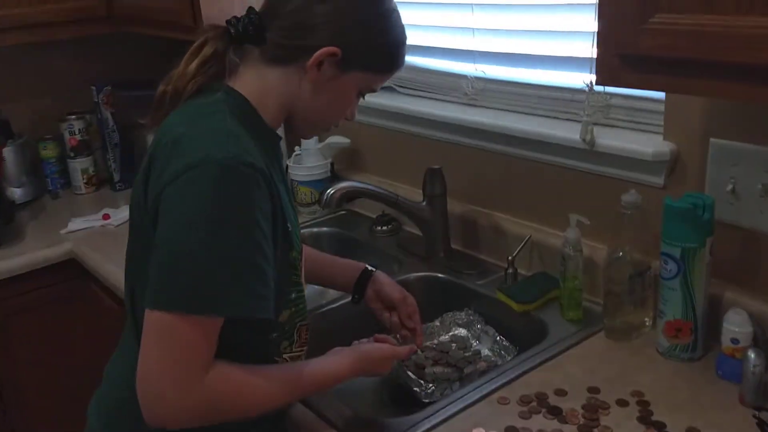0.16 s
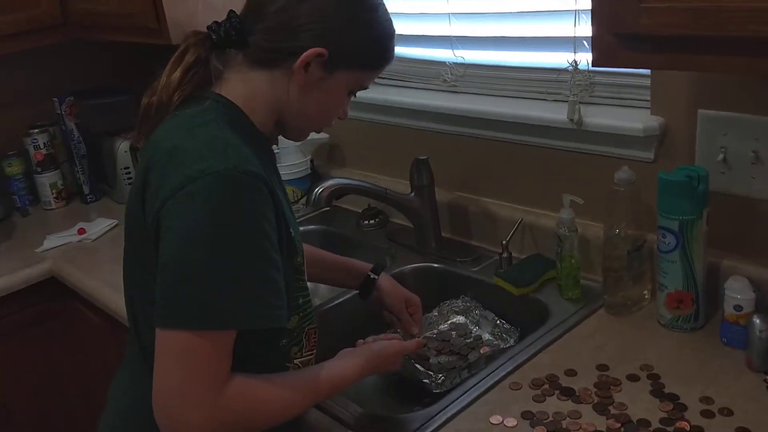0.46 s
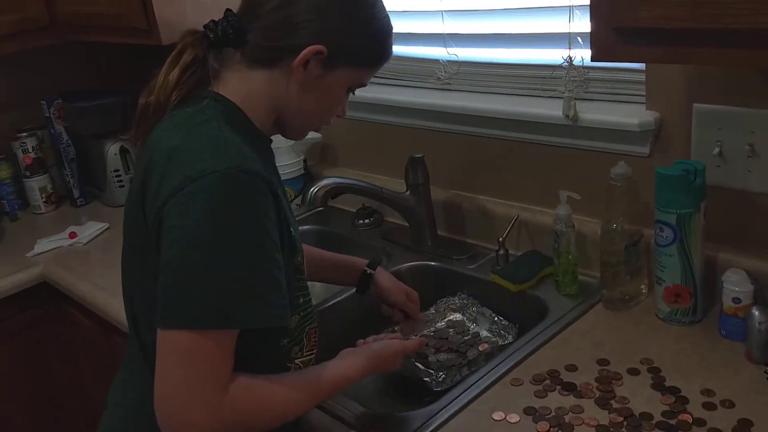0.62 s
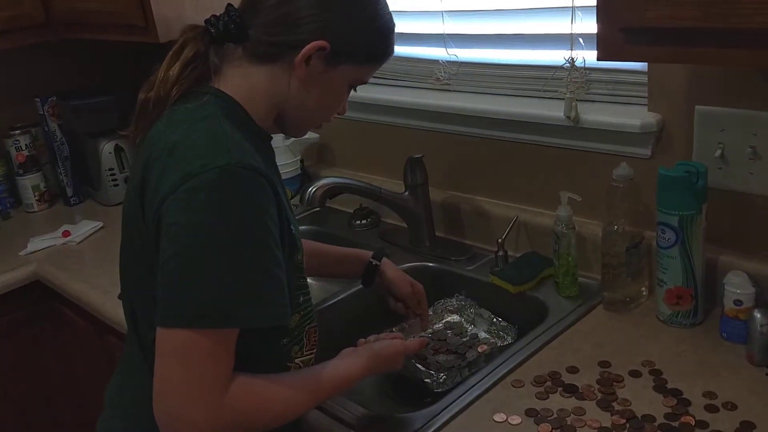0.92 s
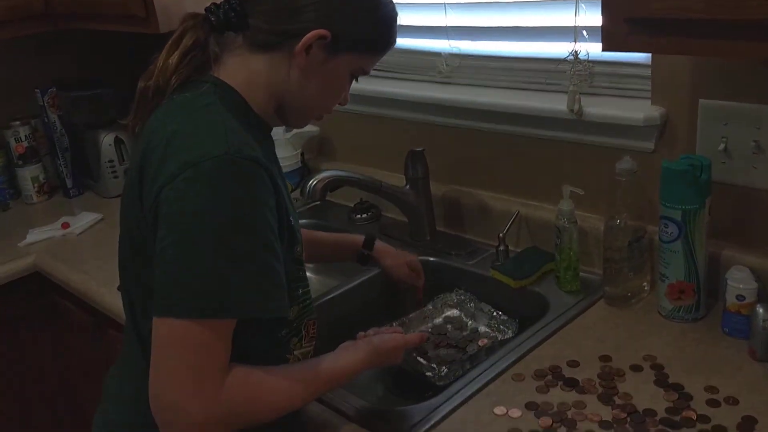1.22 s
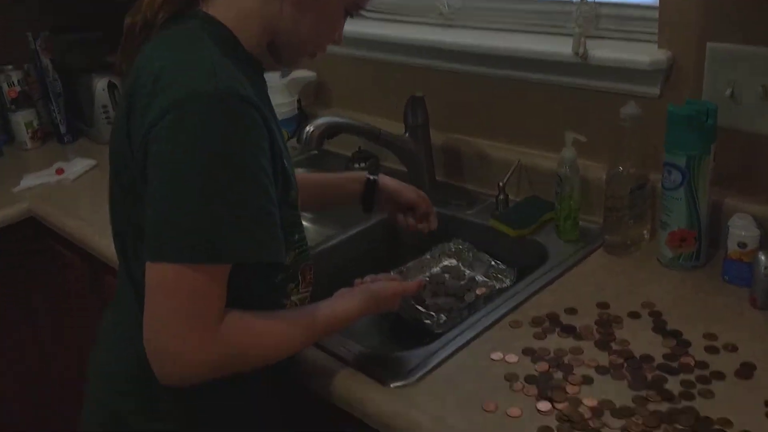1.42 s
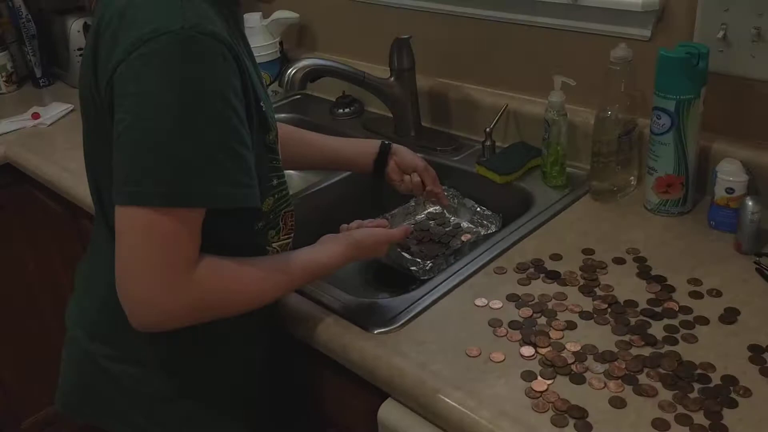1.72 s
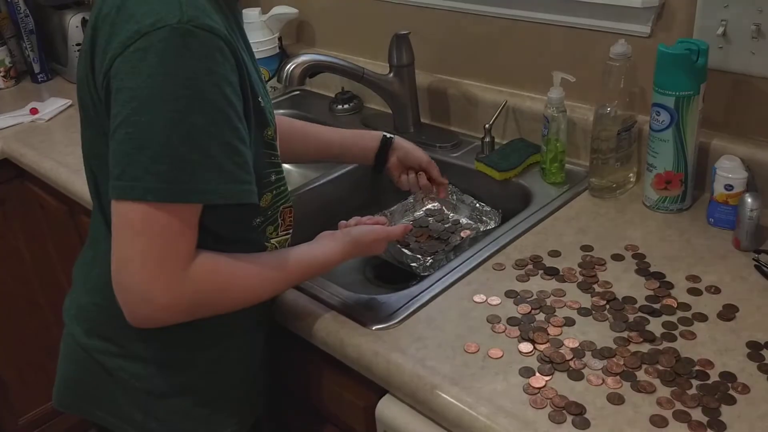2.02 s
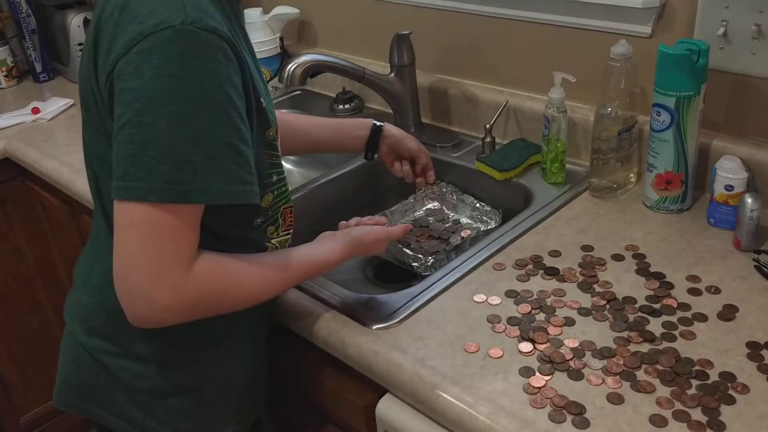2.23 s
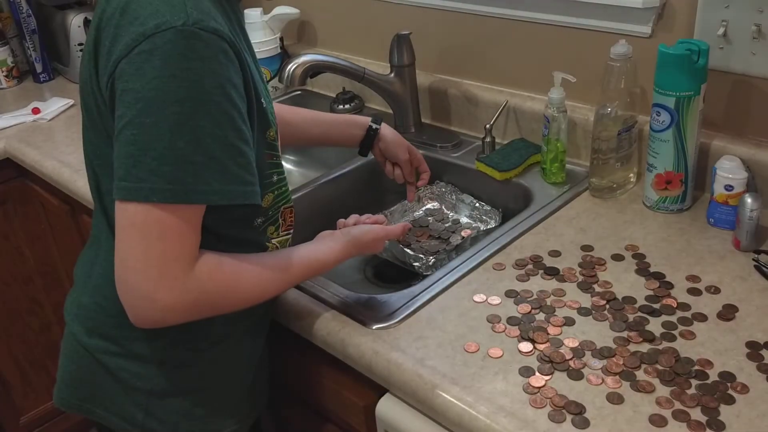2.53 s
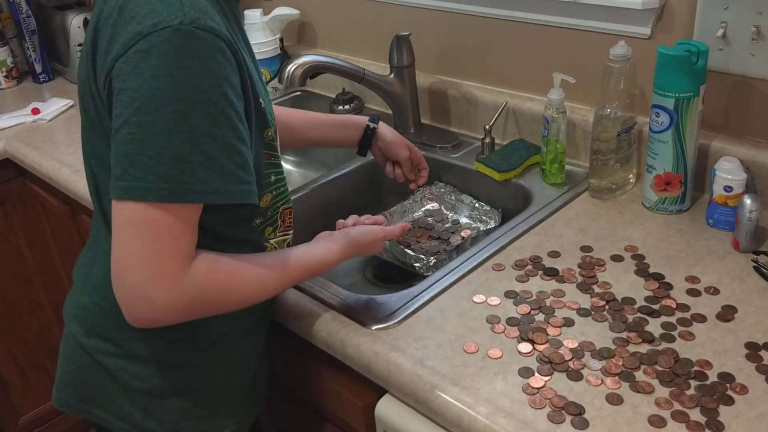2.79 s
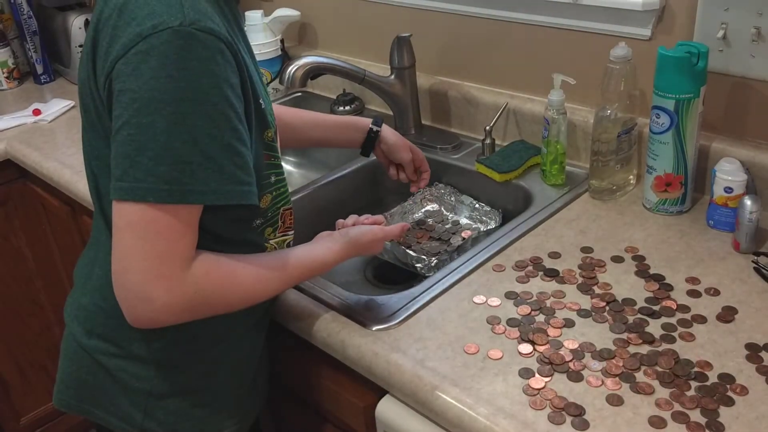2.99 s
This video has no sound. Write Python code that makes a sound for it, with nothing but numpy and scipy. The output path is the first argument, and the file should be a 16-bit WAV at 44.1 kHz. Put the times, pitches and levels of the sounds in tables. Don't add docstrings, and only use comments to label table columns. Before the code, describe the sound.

Bright, thin coin clicks and short high rings, with foil crinkles and small hull knocks, come in irregular clusters over a low motor hum and airy ventilation in a kitchen, heard fairly close.

```python
import sys
import numpy as np
from scipy import signal
from scipy.fft import rfft, irfft
from scipy.io import wavfile

SR = 44100
rng = np.random.default_rng(int(sys.argv[2]) if len(sys.argv) > 2 else 0)


def level_to_linear(level):
    exponent = np.asarray(level, float) / 20
    return 10 ** exponent


def generate_wav(signal):
    frames = np.transpose(np.atleast_2d(signal))
    scaled = np.clip(frames, -1, 1) * 32767
    pcm = np.round(scaled).astype(np.int16)
    wavfile.write(sys.argv[1], SR, pcm)


N = 138915
T = np.arange(N) / SR


def rms_one(x):
    return x / np.sqrt(np.mean(x ** 2) + 1e-20)


def at_hz(points, hz):
    table_hz, level_db = np.array(points).T
    return np.interp(np.log(hz + 1), np.log(table_hz), level_db)


def colour(x, spectrum):
    hz = np.fft.rfftfreq(N, 1 / SR)
    return irfft(rfft(x) * level_to_linear(at_hz(spectrum, hz)), N)


def ring(x, hz, t60):
    radius, angle = level_to_linear(-60 / (t60 * SR)), 2 * np.pi * hz / SR
    return signal.lfilter([0, np.sin(angle)], [1, -2 * radius * np.cos(angle), radius * radius], x + 1e-18)


def clicks_at(s, db):
    clicks = np.zeros(N)
    np.add.at(clicks, (np.asarray(s) * SR).astype(int), level_to_linear(db))
    return clicks


def decays(s, db, t60):
    return signal.lfilter([1], [1, -level_to_linear(-60 / (t60 * SR))], clicks_at(s, db) + 1e-18)


def grains(spectrum, per_s, uneven_db):
    present = rng.random(N) < per_s / SR
    height = level_to_linear(uneven_db * np.minimum(rng.exponential(1, N), 4))
    sign = rng.choice([-1, 1], N)
    return rms_one(colour(present * height * sign, spectrum))


# t/s, gain/dB
GAIN = [(0, -10.5), (.78, -3.5), (1.159, -1), (1.165, -19), (1.32, -14.5), (1.952, -9), (1.964, -21.5),
        (2.641, -12.5), (2.65, -18.5), (2.92, -17), (2.93, -16), (3.15, -15)]


def gain_db(s):
    return np.interp(s, *np.transpose(GAIN))


HUM_HZ = [119.5, 226.3, 245, 361, 422, 566, 59.8]
# width/Hz, level/dB
HUM = [(2.18, -46.5), (3.9, -48), (13, -47), (19, -50), (31.5, -52.5), (10.6, -56), (.6, -54.5)]


def hum():
    motor_hz, motor_db, far_port_db = 226.3, -37.5, 0.45
    tones = np.zeros(N)
    for hz, (width_hz, db) in zip(HUM_HZ, HUM):
        wavering = ring(rng.standard_normal(N + SR), hz, 3.64 / width_hz)
        tones += level_to_linear(db) * rms_one(wavering[SR:])
    steady = level_to_linear(motor_db) * np.sqrt(2) * np.sin(2 * np.pi * motor_hz * T)
    return (tones + steady) * level_to_linear([[far_port_db], [0]])


# f/Hz, level/dB per Hz
AIR = [(92, -17), (135, -3.5), (240, -0.5), (550, -13.5), (1900, -22.5), (3200, -35), (6500, -41),
       (15000, -43.5)]
# f/Hz, likeness/1
LIKENESS = [(60, 0.92), (200, 1), (600, 0.65), (1100, 0.022), (3000, 0.019)]
# f/Hz, level/dB
FAR_PORT = [(200, -2.04), (1500, -3.5), (3000, 3.4), (15000, -9)]


def air():
    air_db = -37
    hz = np.fft.rfftfreq(N, 1 / SR)
    mid, side = rfft(rng.standard_normal((2, N)))
    alike = np.clip(at_hz(LIKENESS, hz), 0, 1)
    ports = np.sqrt(1 + alike) * mid + np.sqrt(1 - alike) * side * [[1], [-1]]
    ports *= level_to_linear(at_hz(AIR, hz))
    ports[0] *= level_to_linear(at_hz(FAR_PORT, hz))
    return level_to_linear(air_db) * rms_one(irfft(ports, N))


def room(x):
    t60_s, room_db, far_port_db = 0.35, -7.5, -9
    t = np.arange(SR // 2) / SR
    fade_in = np.clip((t - .003) / 0.0031, 0, 1)
    tail = rng.standard_normal((2, len(t))) * level_to_linear(-60 * t / t60_s) * fade_in
    tail = tail / np.sqrt(np.sum(tail ** 2, axis=1, keepdims=True))
    tail = tail * level_to_linear([[far_port_db], [0]])
    return level_to_linear(room_db) * signal.fftconvolve(x[None], tail, axes=1)[:, :N]


# t/s, level/dB as heard, t60/s
CRINKLES = [(.05, -64, 9), (.52, -49, 0.25), (1.449, -62, 0.57), (1.467, -61, 0.56), (1.6, -51.5, 0.67),
            (1.748, -57, 0.17), (2.031, -66, 0.61), (2.248, -71.5, 0.24), (2.37, -70.5, 1.2),
            (3.078, -65.5, 0.48)]
# f/Hz, level/dB
CRINKLE = [(1200, 0), (2800, 4.5), (5500, 1), (9000, -5.5), (15000, -2)]


def crinkles():
    bursts = sum(decays([s], db - gain_db(s), t60) for s, db, t60 in CRINKLES)
    return grains(CRINKLE, per_s=7000, uneven_db=2.1) * bursts


# t/s, level/dB as heard, f/Hz, t60/s, ring/cycles
KNOCKS = [(0.506, -36, 3170, 0.028, 30.0), (0.518, -53, 3020, 0.17, 23), (1.19, -41, 1220, 0.006, 5.5),
          (1.449, -62, 3280, 0.028, 7.0), (1.467, -48, 3050, 0.3, 4.1), (1.921, -51, 3200, 0.021, 7.4),
          (1.922, -47, 13400, .015, 6.0), (2.095, -60, 9000, .03, 3.0), (1.747, -45, 7600, .01, 10),
          (1.636, -45, 14700, .015, 15.0), (1.951, -36, 880, 0.03, 11), (1.954, -43, 1740, 0.0093, 6.7),
          (2.642, -35, 1330, 0.014, 4.9), (2.64, -32.5, 663, 0.022, 5.3), (0.051, -48.5, 5530, 0.0067, 19),
          (.0725, -51, 6100, 0.017, 11), (0.0911, -47, 5850, .01, 12), (.1136, -54, 9500, .015, 5.0),
          (.17, -47, 11600, .01, 25.0), (.507, -46, 8570, 0.021, 24), (.523, -46, 10700, .03, 20),
          (.707, -55, 5830, 0.035, 12.0), (1.6025, -42, 5460, 0.022, 39), (1.618, -46, 5560, 0.012, 20),
          (1.617, -41, 10000, 0.021, 31), (1.649, -51, 12200, .012, 25.0), (1.657, -39, 13300, .03, 25.0),
          (1.677, -46, 13500, .012, 9.0), (1.792, -55, 10200, 0.024, 25.0),
          (1.1597, -22, 10370, 0.0042, 19), (3.077, -60, 10000, 0.044, 10)]


def knocks():
    noise = rng.standard_normal(N)
    out = np.zeros(N)
    for s, db, hz, t60, cycles in KNOCKS:
        burst = noise * decays([s], db - gain_db(s), t60)
        both = ring(np.array([noise, burst]), hz, cycles / hz)
        steady, knock = ring(both, hz, 3.0 / hz)
        out += knock / np.std(steady)
    return out


# t/s, length/s, level/dB as heard, beat of the split mode/Hz
FREE = [(.557, .1, -46, 18.5), (.618, .045, -55, 22), (1.244, .015, -49, 20), (2.965, .071, -41, 7),
        (2.972, .078, -41.5, 12), (2.922, .036, -43, 7), (3.031, .014, -49, 25), (3.1, .06, -67, 17),
        (2.92, .005, -31, 70), (2.925, .04, -47, 14), (2.925, .045, -46, 14), (.552, .006, -42, 60),
        (2.968, .016, -56, 30), (3.036, .022, -54, 20), (3.052, .026, -55, 32), (1.946, .17, -53, 24)]
FREE_HZ = [12685, 12150, 13590, 12878, 12416, 14836, 14050, 12417, 12560, 12880, 12418, 12600, 15780, 12878,
           12417, 15690]


def free_coins():
    t60_s, split_share, catch_s = .9, .8, .002
    out = np.zeros(N)
    for (s, length, db, beat_hz), hz in zip(FREE, FREE_HZ):
        t = T - s
        caught = np.exp(-np.maximum(t - length, 0) / catch_s)
        shape = (t > 0) * level_to_linear(-60 * t / t60_s) * caught
        pair = np.sin(2 * np.pi * hz * t) - split_share * np.sin(2 * np.pi * (hz + beat_hz) * t)
        out += level_to_linear(db - gain_db(s)) * shape * pair
    return out


# t/s, peak level/dB as heard, dull part level/dB, rattle level/dB
TOUCHES = [(0.0512, -40, -54, -64), (0.0725, -39, -58, -51), (0.0905, -48, -63, -67),
           (0.1704, -44, -54, -50.5), (0.2884, -39, -54, -59), (0.5216, -54, -51, -43),
           (.5065, -52, -58, -45), (0.5546, -41, -65, -44), (0.5741, -44, -70, -51), (0.62, -50, -65, -46),
           (0.6372, -48, -62, -39), (0.701, -42, -62, -45), (0.711, -61.5, -56, -63),
           (1.1597, -11.5, -29.5, -20.5), (1.1849, -31, -62, -33), (1.2466, -42, -57, -49),
           (1.2691, -41.5, -62, -53), (1.6028, -43, -43, -35.5), (1.618, -32, -43.5, -51),
           (1.6348, -35, -67, -59), (1.6581, -48, -70, -42), (1.6761, -37.5, -71, -67),
           (1.7474, -38, -59, -53), (1.9174, -46, -57, -47), (1.9294, -52, -48.5, -48),
           (1.9451, -28, -51, -28.5), (1.9521, -25, -39, -21), (2.0294, -43, -54, -44),
           (2.2473, -48, -57, -47)]
LATE_TOUCHES = [(2.6404, -30, -49, -24.5), (2.6554, -39.5, -70, -50), (2.6624, -44, -68, -52),
                (2.6803, -40, -70, -45), (2.9112, -48, -48, -37.5), (2.9193, -29, -63, -37),
                (2.922, -50, -70, -51), (2.9344, -53, -69, -63), (2.9474, -46, -67, -40),
                (2.9744, -50, -70, -37), (3.0344, -50, -66, -50)]
# f/Hz, level/dB
CRACK = [(6000, -11), (9500, -4), (12500, 0), (15000, -3), (17500, -4)]
# f/Hz, level/dB
DULL_CRACK = [(700, -0.5), (3000, -18), (5200, -3.5), (8000, 0), (10500, -22)]
# f/Hz, level/dB
RATTLE = [(1500, -9), (4000, -20.5), (7000, -7.5), (10000, -14), (12800, 4.5), (15000, -2.5), (17500, -20)]
# f/Hz, level/dB, t60/s
HEAPS = [
    [(12170, -12, 0.1), (12690, -3, 0.1), (14500, -14, 0.1)],
    [(11870, -8, 0.1), (11983, -5, 0.1), (13597, -12, 0.1), (14040, -16, 0.1), (14396, -10, 0.1),
     (15048, -1, 0.1), (15720, -14, 0.1)],
    [(12265, -8, 0.05), (12930, -6, 0.03), (13600, -6, 0.06), (14040, -9, 0.08), (14600, -9, 0.08)],
]
# f/Hz, level/dB, t60/s
FULLER_HEAPS = [
    [(12780, -4, 0.06), (12994, 2, 0.08), (13640, 8, 0.05), (13940, 0, 0.06), (15670, 0, 0.06)],
    [(11700, -6, 0.1), (12350, 2, 0.1), (12695, 6, 0.1), (12880, 10, 0.1), (13940, 2, 0.1),
     (14327, 13, 0.1), (14570, 0, 0.1), (14840, 10, 0.1), (15720, 0, 0.05)],
    [(13590, 0, 0.1), (14050, -14, 0.1), (14390, -10, 0.1), (14840, 4, 0.1), (15780, -2, 0.09)],
]
HEAP_FROM_S = [.4, 1, 1.5, 1.85, 2.5, 2.85]


def touches():
    crack_t60_s, rattle_t60_s, heap_db, longest_t60_s = .0042, 0.087, -15, .09
    s, *levels = np.transpose(list(TOUCHES) + list(LATE_TOUCHES))
    db, dull_db, rattle_db = levels - gain_db(s)

    crack = rms_one(colour(rng.standard_normal(N), CRACK))
    dull = rms_one(colour(rng.standard_normal(N), DULL_CRACK))
    rattle = grains(RATTLE, per_s=2500, uneven_db=3.3)
    noisy = crack * decays(s, db - 3.5, crack_t60_s)
    noisy += dull * decays(s, dull_db, crack_t60_s * 5.4)
    noisy += rattle * decays(s, rattle_db - 6.5, rattle_t60_s)

    heap = np.searchsorted(HEAP_FROM_S, s) - 1
    luck_db = 4 * rng.normal(0, 1, (len(s), 14))
    tonal = np.zeros(N)
    for k, modes in enumerate(list(HEAPS) + list(FULLER_HEAPS)):
        struck = heap == k
        for m, (hz, mode_db, t60) in enumerate(modes):
            hit_db = db + heap_db + mode_db + luck_db[:, m]
            hit = clicks_at(s[struck], hit_db[struck])
            tonal += ring(hit, hz, np.clip(t60, .01, longest_t60_s))
    return noisy, tonal


def scene():
    direct_far_db, port_lag, tones_wet_db = -19, 8, -17
    noisy, tonal = touches()
    hits = noisy + knocks() + crinkles()
    tones = tonal + free_coins()
    facing = hits + tones
    shaded = level_to_linear(direct_far_db) * np.roll(facing, port_lag)
    echoes = room(hits + level_to_linear(tones_wet_db) * tones)
    return 1.356 * (np.array([shaded, facing]) + echoes) + air() + hum()


def low_pass(x):
    return signal.sosfilt(signal.butter(12, 17210, fs=SR, output="sos"), x)


# f/Hz, level/dB
TOP_CUT = [(15800, 0), (15950, -36), (17200, -60)]


def record(dry):
    cross_share, cross_lag, left_db, bass_cut_hz, ceiling = .81, 20, -1, 58, .48
    late = np.pad(dry[::-1], ((0, 0), (cross_lag, 0)))[:, :N]
    wide = (dry - cross_share * late) * level_to_linear(gain_db(T) + [[left_db], [0]])
    wide = signal.sosfilt(signal.butter(2, bass_cut_hz, "high", fs=SR, output="sos"), wide)
    limited = ceiling * np.tanh(wide / ceiling)
    return low_pass(colour(limited, TOP_CUT))


dry = scene()
out = record(dry)
generate_wav(out)
```